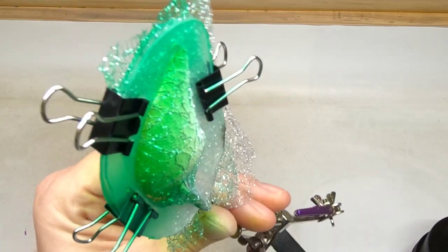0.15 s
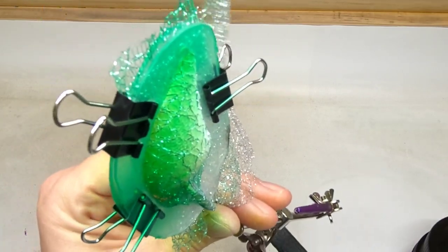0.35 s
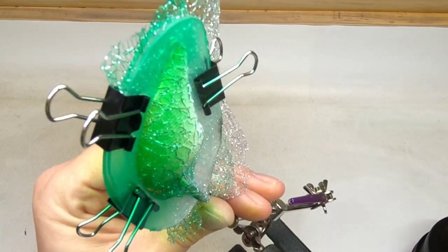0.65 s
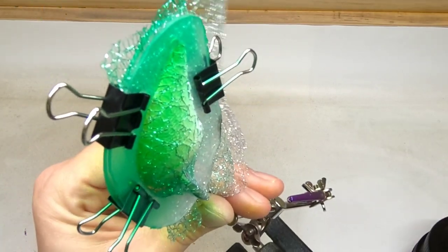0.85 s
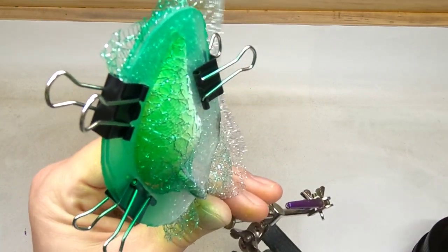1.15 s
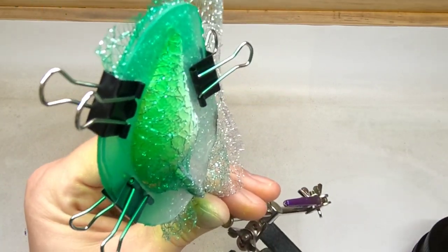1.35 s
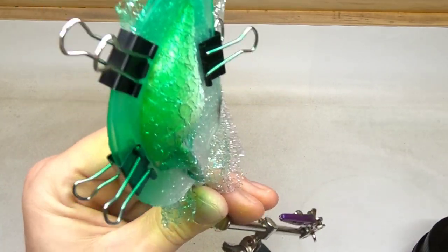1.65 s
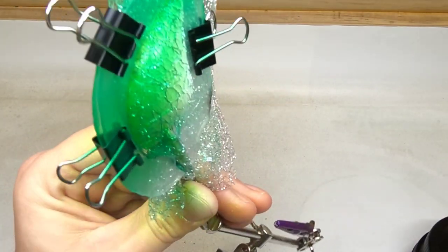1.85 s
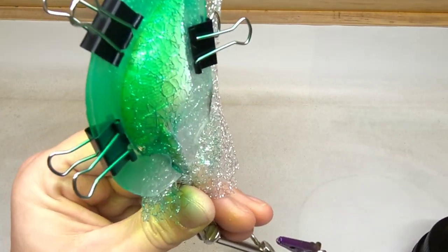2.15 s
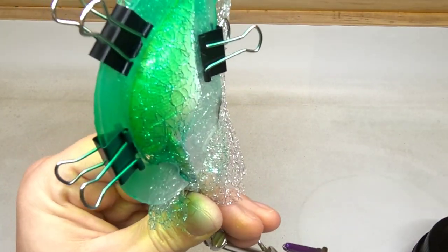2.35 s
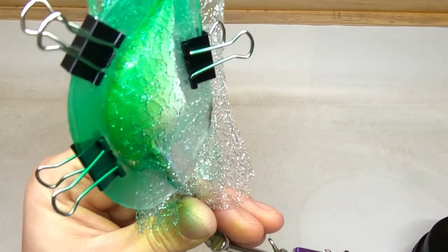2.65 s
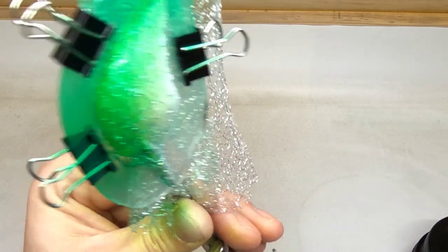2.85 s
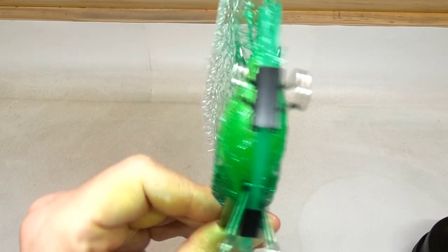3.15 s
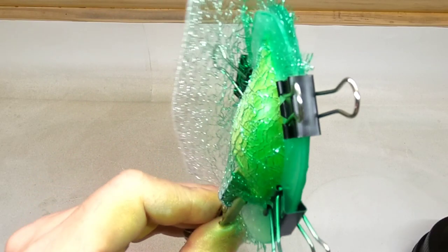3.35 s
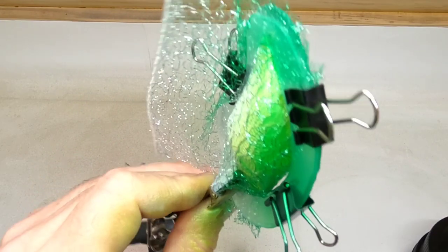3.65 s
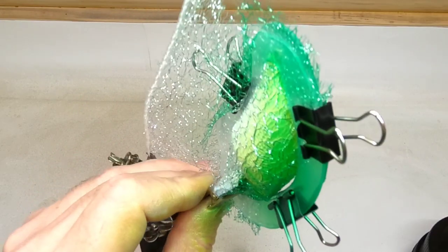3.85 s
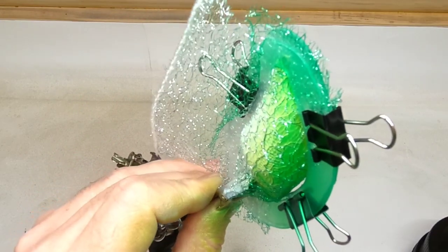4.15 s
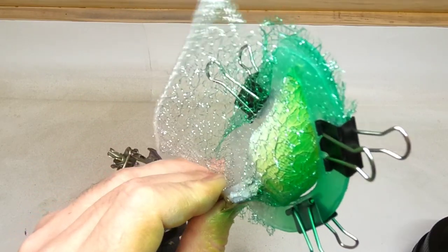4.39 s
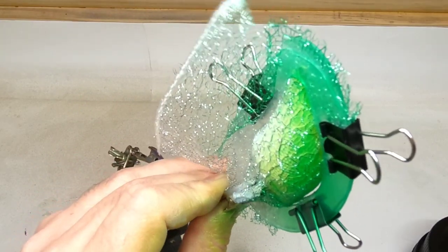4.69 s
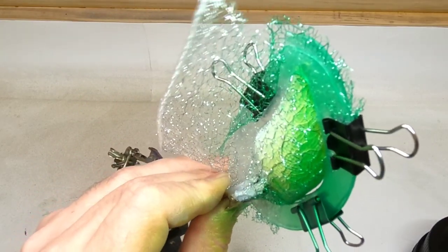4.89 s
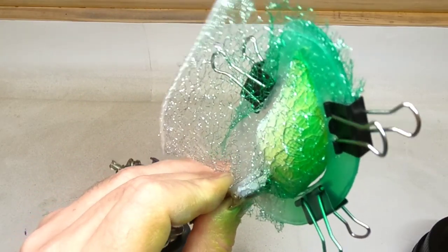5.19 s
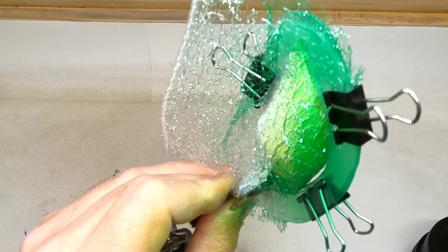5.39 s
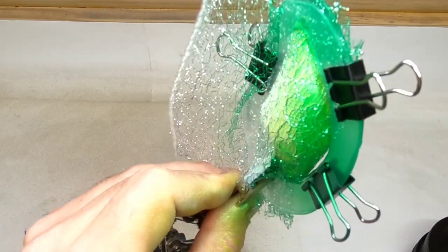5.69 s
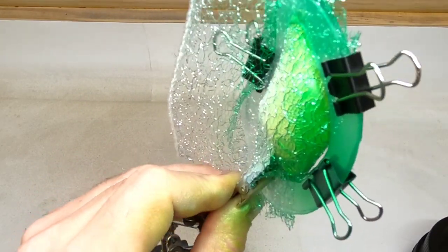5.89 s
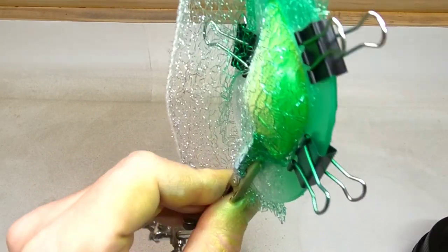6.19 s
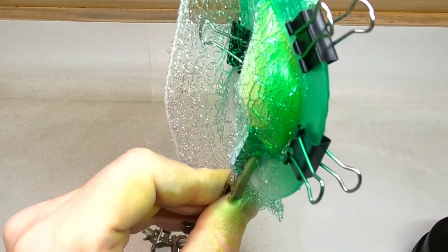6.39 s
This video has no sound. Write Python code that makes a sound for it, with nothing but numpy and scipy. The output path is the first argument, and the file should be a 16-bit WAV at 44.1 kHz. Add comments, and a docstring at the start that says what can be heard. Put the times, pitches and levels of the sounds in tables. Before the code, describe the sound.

In a small workshop, a piston compressor throbs deeply and chatters, nearly masking a thin airbrush hiss that starts with a tick. At about two seconds it cuts out, venting a bright whistling hiss while the throb coasts down. Spraying pauses, a tiny spurt and two faint knocks follow, then a steady hiss continues over fan hum. Close stereo recorder, with automatic gain gradually lifting the background.

```python
"""An airbrush hisses onto a small part held in a spray booth, over the steady hum of an extractor fan.
A piston compressor throbs and chatters until its tank is full, cuts out and vents with a whistling hiss.
The air stops briefly while the part is turned over with two faint knocks; then the spraying goes on.
Hisses are shaped noise, machine tones are sines, and both reach the two microphone ports of a recorder.
Its gain control ducks under the compressor, so the fan comes up once the compressor has stopped."""
import sys
import numpy as np
from scipy import signal
from scipy.fft import rfft, irfft
from scipy.io import wavfile
from scipy.ndimage import uniform_filter1d

SR = 44100
rng = np.random.default_rng(int(sys.argv[2]) if len(sys.argv) > 2 else 0)


def pcm_store(signal):
    """Save signal as 16-bit PCM."""
    levels = np.round(np.clip(np.atleast_2d(signal), -1, 1) * 32767)
    wavfile.write(sys.argv[1], SR, levels.astype(np.int16).T)


N = 287973
TIME = np.arange(N) / SR

# Levels are those ahead of the recorder's gain control; spectra give relative levels only.
# Spray passes: [air on t/s, trigger pulled back t/s, air off t/s, full-trigger level/dB]
SPRAY_PASSES = [(0.173, 0.7, 2.78, -42), (3.223, 3.3, 3.345, -47.5), (3.609, 4.28, 6.6, -44.5)]
# Where the jet lands: [t/s, share of the sound's colour from the part's edge and the booth 0-1]
JET_AIM = [(0, 0.49), (2.0, 0.39), (3.2, 0.11), (3.6, 0.34), (3.95, 0.45), (4.3, 0.13), (6.53, 0.024)]
# Jet square on the part: [f/Hz, level per Hz/dB]
JET_ON_PART = [(590, -8), (1000, -13.5), (1350, -11.5), (1460, -9), (1620, -17), (1840, -6.5),
               (1990, -11.5), (2880, -10), (3300, -12.5), (4610, -15), (6510, 2), (7550, -1), (8980, -9.5),
               (14900, -15.5), (15600, -24.5)]
# Jet past the part's edge, onto the booth: [f/Hz, level per Hz/dB]
JET_OFF_PART = [(710, -43), (1200, -14), (1250, -28), (1690, -22), (2310, -6.5), (2800, -14.5), (3550, 1),
                (4250, -1), (7430, -4.5), (9110, -9.5), (15600, -8.5)]
# The jet at the two microphone ports: [f/Hz, coherence 0-1, left lead/rad, left-right level/dB]
JET_AT_PORTS = [(1180, 0.24, -2.5, 4.5), (2180, 0.28, 0, 3), (3800, 0.42, 0.4, 1), (5200, 0.86, 1.56, 2.5),
                (5800, 0.74, 0.97, 1.5), (7400, .72, 1.85, 4.5), (7950, .6, 1.3, 0), (9160, 0.2, 3, 5),
                (9800, 0, -2, -0.5), (11300, 0.4, -4, 5.5), (14500, 0, 2.2, 2.5)]
# Ticks of the opening air valve: [t/s, level/dB]
TRIGGER_TICKS = [(0.1742, -30), (3.61, -46)]
# Spit of air in each tick: [f/Hz, level per Hz/dB]
SPIT = [(1200, -20), (2800, 0), (6500, -2), (11000, -14), (16000, -25)]

# Compressor shaft: [t/s, turns per second/Hz]
SHAFT_SPEED = [(0, 28.1), (2.07, 28.1), (2.25, 27.8), (3.3, 27.9)]
# Tones of pump and housing: [multiple of the shaft rate, level against the throb/dB]
HOUSING_TONES = [(3, -56.5), (4, -23), (5, -29), (6, -42), (7, -32.5), (8, -37), (10, -34), (11, -28.5),
                 (12, -43.5), (14, -54), (15, -44.5), (16, -43.5), (17, -46), (18, -32), (23, -39.5),
                 (29, -55), (31, -48), (32, -43), (33, -40.5), (38, -43), (42, -53), (49, -36.5), (58, -57),
                 (62, -60), (67, -45.5), (84, -48)]
# Valve and intake noise: [f/Hz, level per Hz/dB]
VALVE_CHATTER = [(120, -14), (200, -5.5), (300, -4.5), (380, -8), (500, -6.5), (600, -16.5), (920, -7),
                 (1250, -11.5), (1900, -13), (2800, -18.5), (5000, -21.5), (7600, -20.5), (8800, -33.5),
                 (15000, -42)]
# The compressor at the ports: [f/Hz, coherence 0-1, left lead/rad, left-right level/dB]
PUMP_AT_PORTS = [(100, 0.47, 0, 12.5), (278, 0.61, -0.97, -0.5), (540, 0.85, 0.6, -2),
                 (940, 0.97, -2.25, 0), (1320, 0.72, -1.3, -1), (1970, 0.21, 0.67, 3),
                 (5000, 0.5, -0.3, -0.5)]

# Puffs let out of the compressor head: [start t/s, level/dB, time to sink 10 dB/s]
VENT_PUFFS = [(2.082, -30.5, 0.97), (3.214, -40, 0.04)]
# Vent hiss at full pressure: [f/Hz, level per Hz/dB]
VENT_FULL = [(760, -26), (1300, -10), (1380, -17), (1810, -9), (2400, -13), (2550, -9), (3870, -11.5),
             (5570, -7.5), (6110, -2), (7850, -3), (15600, -17.5)]
# Vent hiss as the pressure falls: [f/Hz, level per Hz/dB]
VENT_FALLING = [(760, -40), (1300, -27.5), (1870, -19), (2080, -21.5), (2280, -19.5), (3110, -15),
                (4390, -17), (5570, -10), (6370, -3.5), (7690, -2.5), (8440, -8), (14800, -23.5),
                (15600, -16)]
# Slide of the vent's colour: [t/s, share of the falling-pressure hiss 0-1]
VENT_SLIDE = [(2.15, 0.11), (2.3, 0.65), (2.8, 1)]
# Cavity modes of the vent: [f/Hz, level against the hiss before WHISTLE_LIFT_DB/dB,
# loudest t/s, Gaussian width/s]
VENT_WHISTLES = [(5886, -14.5, 2.145, .03), (6590, -23, 2.65, .3), (6831, -23, 2.9, .3),
                 (7149, -23, 2.6, .3), (7494, -21, 2.6, .4), (7607, -16, 2.7, .5), (7803, -15, 2.42, .2),
                 (8414, -25, 2.5, .4), (9222, -27, 2.5, .4), (10239, -27, 2.6, .4)]
# The vent at the ports: [f/Hz, coherence 0-1, left lead/rad, left-right level/dB]
VENT_AT_PORTS = [(1300, 0.53, -1.5, -1), (3800, 0.58, -0.5, 0), (6100, 0.4, 1.1, 0.5), (7750, 0.28, 4.5, 6),
                 (9150, .15, 1, 0), (10400, 0.17, 1, 2.5), (15000, .1, 8.5, 5)]

# Knocks of the clamped part being turned over: [t/s, f/Hz, level/dB, t60/s]
PART_KNOCKS = [(3.493, 2650, -58, 0.06), (3.555, 680, -39.5, 0.027)]

# Air rushing through the booth fan: [f/Hz, level per Hz/dB]
FAN_RUSH = [(90, -14.5), (170, 5), (220, 0.5), (350, -7), (460, -4.5), (780, -8.5), (1000, -19),
            (1800, -24), (4000, -42.5), (8000, -55), (15000, -67)]
# Blade tones: [f/Hz, level against the rush/dB, left-right level/dB]
BLADE_TONES = [(290.7, -11.5, 12), (300, -12.5, -11), (458.4, -12, 2), (482, -15.5, 2), (723.4, -15, -50)]
# Low rumble of the duct: [f/Hz, level per Hz/dB]
DUCT_RUMBLE = [(20, -33), (40, -31), (52, -15), (85, -12.5), (112, 5), (135, -9), (170, -32), (260, -41),
               (700, -100)]
# Motor hum: [f/Hz, level against the rumble/dB, left-right level/dB]
FAN_MOTOR_TONES = [(76.7, -9.5, -8), (120.14, -1.5, -16.5)]
# Uneven level of the low rumble and its hum tones: [t/s, level/dB]
RUMBLE_LEVEL = [(2.05, -31), (2.18, -33.5), (2.55, -29.5), (2.8, -34), (3.04, -26.5), (3.22, -37),
                (3.43, -27), (3.55, -40.5), (3.82, -30.5), (4.3, -29.5), (4.62, -34.5), (4.73, -29.5),
                (4.96, -29), (5.17, -32.5), (5.57, -29), (5.68, -34.5), (6.25, -33), (6.43, -29.5),
                (6.53, -33.5)]
# Fan and duct at the ports: [f/Hz, coherence 0-1, left lead/rad, left-right level/dB]
FAN_AT_PORTS = [(60, 0.94, 1.5, 5.5), (115.6, 0.61, 0.07, -4.5), (168, 0.45, 1.33, -0.5),
                (424, 0.62, -0.76, -6), (523, 0.41, -1.4, -1.5), (640, 0.38, 0.26, -6),
                (1140, 0.42, -2.1, 0.5), (3000, 0.18, 0.1, -1)]

OPEN_DB_PER_S, CLOSE_DB_PER_S = 720, 128  # how fast the spray comes; how fast spray and vent die away
SPURT_DB, SPURT_S = 5, 0.084  # pressure stored in the hose escapes first
LIGHT_DB, PULL_S = -6.5, 0.12  # each pass starts on a light trigger, which is then pulled back
COMPRESSOR_DB, CUT_OUT_S = -14.5, 2.093  # level of the deep throb; the motor is switched off
COAST_S, COAST_STEEPNESS = 0.32, 3.0  # the throb coasts down to half its amplitude in this time
UNLOAD_DB_PER_S, IDLE_DB = 112, -16  # the piston's work ends quickly, leaving a light idle rattle
MAINS_HUM_HZ, MAINS_DB = 120, -21.5  # the motor's hum, with its level against the throb
MAINS_SWING = 0.73  # how far the strokes swing the hum, as a share of its amplitude
VENT_OPEN_DB_PER_S, VENT_SHUT_S = 800, 3.295  # the vent snaps open, and seats again once the head is empty
WHISTLE_LIFT_DB = 2
FAN_DB = -45.5  # level of the fan's rush
KNEE_DB, RATIO, RECOVER_DB_PER_S = -22, 4.03, 4.0  # the recorder's gain control
EDGE_HZ = 15750  # upper band limit of the recorder


def airbrush():
    """The jet hisses on the part inside the booth, fluttering a little as paint is torn off the needle."""
    jet = rush(JET_ON_PART, JET_AT_PORTS, patchy_db=1.5, other=JET_OFF_PART, blend=JET_AIM)
    flow = sum(spray_pass(*row) for row in SPRAY_PASSES)
    flutter = amp(0.71 * wander(hz=25))
    return reflected(jet, wet=0.11, t60=0.15) * flow * flutter


def spray_pass(on_s, pull_s, off_s, db):
    """Strength of one pass: a spurt of stored air, a moment on a light trigger, then the full jet."""
    spurt = np.exp(-since(on_s) / SPURT_S)
    light = (1 - np.tanh((TIME - pull_s) / (2 * PULL_S))) / 2
    return valve(on_s, off_s, OPEN_DB_PER_S) * amp(db + SPURT_DB * spurt + LIGHT_DB * light)


def trigger(decay_s=0.002):
    """The opening air valve lets out a short spit of noise that dies away exponentially."""
    spit = rush(SPIT, JET_AT_PORTS, patchy_db=0)
    ticks = 0
    for s, db in TRIGGER_TICKS:
        ticks = ticks + amp(db) * (TIME >= s) * np.exp(-abs(TIME - s) / decay_s)
    return spit * ticks


def compressor(chatter_db=-27.5, buzz_db=-31.5, stroke_depth=0.39):
    """Piston strokes give a deep throb, pulsing motor hum, housing tones and valve chatter on each turn."""
    shaft_rate = curve(SHAFT_SPEED) * (1 + 0.00036 * wander(hz=4.5))
    turns = np.cumsum(shaft_rate) / SR
    first_rate = SHAFT_SPEED[0][1]
    coast = 1 / (1 + (since(CUT_OUT_S) / COAST_S) ** COAST_STEEPNESS)
    load = np.maximum(amp(-UNLOAD_DB_PER_S * since(CUT_OUT_S)), amp(IDLE_DB) * coast)
    throb = tone(2 * turns, lead=1.56, balance_db=-12.0)

    housing = 0
    for multiple, db in HOUSING_TONES:
        _, lead, balance_db = read(PUMP_AT_PORTS, multiple * first_rate)
        housing = housing + amp(db) * tone(round(multiple) * turns, lead, balance_db)

    chatter = rush(VALVE_CHATTER, PUMP_AT_PORTS, patchy_db=2)
    # the valves rattle alike on every turn: one turn's burst, repeated, is a dense buzz
    burst_s = turns % 1 / first_rate
    buzz = evened(np.array([np.interp(burst_s, TIME, port[::-1]) for port in chatter]))
    stroke = 1 + stroke_depth * np.cos(2 * np.pi * turns)

    mains_pulse = 1 + MAINS_SWING * np.cos(4 * np.pi * turns)  # two pulses a turn
    mains = amp(MAINS_DB) * mains_pulse * tone(MAINS_HUM_HZ * TIME, lead=0, balance_db=0)
    rattle = mains + housing + amp(chatter_db) * chatter + amp(buzz_db) * stroke * buzz
    return amp(COMPRESSOR_DB) * (coast * throb + load * rattle)


def vent():
    """The head empties through a small valve across the room; narrow modes whistle as pressure falls."""
    air = rush(VENT_FULL, VENT_AT_PORTS, patchy_db=1.1, other=VENT_FALLING, blend=VENT_SLIDE)
    air = reflected(air, wet=0.59, t60=0.15)
    for hz, db, peak_s, width_s in VENT_WHISTLES:
        turns = np.cumsum(hz + 9 * wander(hz=39.7)) / SR
        swell = np.exp(-((TIME - peak_s) / width_s) ** 2 / 2)
        strength = amp(db + 3.6 * wander(hz=12) + WHISTLE_LIFT_DB)
        air = air + swell * strength * tone(turns, lead=1.2, balance_db=4.5)
    return air * vent_flow()


def vent_flow():
    """Each puff sinks ever faster as its pressure runs out, until the valve seats; powers add."""
    puffs = []
    for s, db, sink_s in VENT_PUFFS:
        pressure = amp(db - 10 * (since(s) / sink_s) ** 2)
        puffs.append(valve(s, VENT_SHUT_S, VENT_OPEN_DB_PER_S) * pressure)
    return np.linalg.norm(puffs, axis=0)


def handling():
    """Each knock rings briefly on one mode of the part or its clamps, alike at both ports."""
    knocks = 0
    for s, hz, db, t60 in PART_KNOCKS:
        ring = np.sin(2 * np.pi * hz * since(s))
        knocks = knocks + amp(db - 60 * since(s) / t60) * ring
    return knocks


def fan():
    """The extractor: rushing air with blade tones, over a low rumble and hum of uneven level."""
    air = rush(FAN_RUSH, FAN_AT_PORTS, patchy_db=1.5, size=2048) + hum(BLADE_TONES)
    rumble = rush(DUCT_RUMBLE, FAN_AT_PORTS, patchy_db=2, size=4096) + hum(FAN_MOTOR_TONES)
    # level the slow drift, so that only the quick beating stays random
    rumble = rumble / np.sqrt(uniform_filter1d(rumble.mean(0) ** 2, size=SR // 6))
    return air * amp(FAN_DB) + rumble * amp(curve(RUMBLE_LEVEL))


def hum(tones):
    """Steady machine tones that waver in pitch and strength."""
    out = 0
    for hz, db, balance_db in tones:
        turns = np.cumsum(hz * (1 + 0.0015 * wander(hz=3.03))) / SR
        out = out + amp(db + 2 * wander(hz=7.1)) * tone(turns, 0, balance_db)
    return out


def rush(spectrum, ports, patchy_db, other=None, blend=None, size=1024):
    """Turbulent noise at both ports; its colour can slide towards another spectrum."""
    hop = size // 4
    t, hz = np.arange(N // hop + 5) * hop / SR, np.fft.rfftfreq(size, 1 / SR)
    a, b, c, d, patches = rng.standard_normal((5, len(t), len(hz)))
    shared, separate = a + 1j * b, c + 1j * d
    # smooth over frames, then over frequency bins
    patches = uniform_filter1d(uniform_filter1d(patches, size=10, axis=0), size=14, axis=1)
    field_db = read(spectrum, hz)[0] + np.zeros((len(t), 1))
    if other is not None:
        share = np.clip(curve(blend, t), 0, 1)[:, None]
        field_db += share * (read(other, hz)[0] - field_db)
    gain = amp(field_db)
    # every frame is brought to equal power before the patches are laid on
    gain *= amp(patchy_db * patches / patches.std()) / np.linalg.norm(gain, axis=1, keepdims=True)
    same, lead, balance_db = read(ports, hz)
    same = np.clip(same, 0, 1)
    left = shared * np.exp(1j * lead) * amp(balance_db / 2)
    right = (same * shared + np.sqrt(1 - same ** 2) * separate) * amp(-balance_db / 2)
    frames = np.array([(left * gain).T, (right * gain).T])
    return evened(signal.istft(frames, nperseg=size, noverlap=size - hop)[1][:, :N])


def reflected(pair, wet, t60):
    """Walls add dense echoes that comb a hiss into fine fixed ridges, other ones at each port."""
    t = np.arange(SR // 4) / SR
    signs = rng.choice([-1., 1.], (2, len(t)))
    sparse = rng.random((2, len(t))) < 0.1
    taps = signs * sparse * amp(-60 * t / t60)
    taps = taps / np.linalg.norm(taps, axis=1, keepdims=True)
    echoes = signal.oaconvolve(pair, taps, axes=1)[:, :N]
    wet = np.clip(wet, 0, 1)  # share of the power
    return evened(np.sqrt(1 - wet) * pair + np.sqrt(wet) * echoes)


def tone(turns, lead, balance_db):
    """A sine at both ports, of rms 1 at the centre."""
    angle = 2 * np.pi * (turns + rng.random())
    return evened(np.array([amp(balance_db) * np.sin(angle + lead), np.sin(angle)]))


def valve(on_s, off_s, open_db_per_s):
    """Air flow, 0-1, through a valve that opens quickly, holds and dies away."""
    return amp(-open_db_per_s * np.maximum(on_s - TIME, 0) - CLOSE_DB_PER_S * since(off_s))


def wander(hz):
    """Slow chance of rms 1, up to about hz."""
    spectrum = rfft(rng.standard_normal(N))
    slow = irfft(spectrum * np.exp(-(np.fft.rfftfreq(N, 1 / SR) / hz) ** 2), N)
    return (slow - slow.mean()) / slow.std()


def evened(pair):
    """Scales a stereo pair so that its centre, the mean of the ports, has rms 1."""
    return pair / np.sqrt(np.mean(pair.mean(0) ** 2) + 1e-20)


def since(s):
    """Seconds gone by since s, zero before."""
    return np.maximum(TIME - s, 0)


def amp(db):
    """Decibels to gain."""
    return 10 ** (np.asarray(db) / 20)


def curve(rows, t=TIME):
    """A control curve read at the times t."""
    return np.interp(t, *np.transpose(rows))


def read(rows, hz):
    """Every column of a table over frequency, read on a log axis."""
    f, *columns = np.transpose(rows)
    return [np.interp(np.log(hz + 1), np.log(f + 1), c) for c in columns]


def scene():
    """All sources at the two ports."""
    return airbrush() + trigger() + compressor() + vent() + handling() + fan()


def record(dry):
    """Gain control holds everything down while the compressor throbs and recovers slowly; then a band limit."""
    level_db = 10 * np.log10(abs(uniform_filter1d(dry.mean(0) ** 2, size=SR // 7)) + 1e-12)
    cut_db = np.maximum(level_db - KNEE_DB, 0) * (1 - 1 / RATIO)
    recovery = RECOVER_DB_PER_S * TIME
    # a running maximum: the cut deepens at once but eases only at the recovery rate
    held_db = np.maximum.accumulate(cut_db + recovery) - recovery
    ducked = dry * amp(-held_db)
    low_pass = signal.firwin(1023, EDGE_HZ, window=("kaiser", 9), fs=SR)
    return signal.oaconvolve(ducked, low_pass[None], "same", axes=1)


dry = scene()
out = record(dry)
pcm_store(out)
```